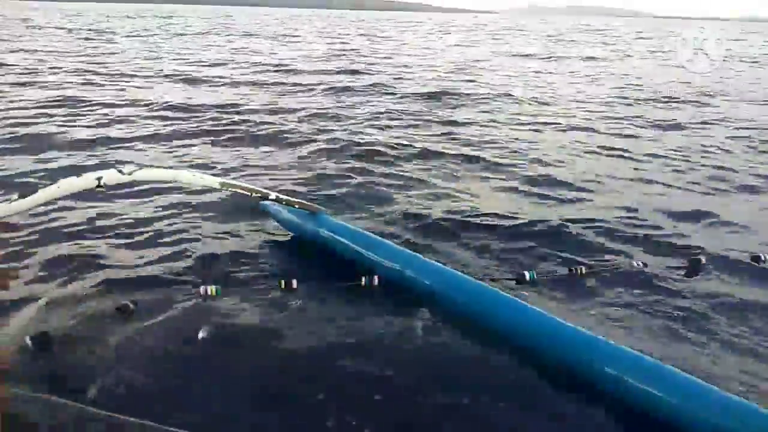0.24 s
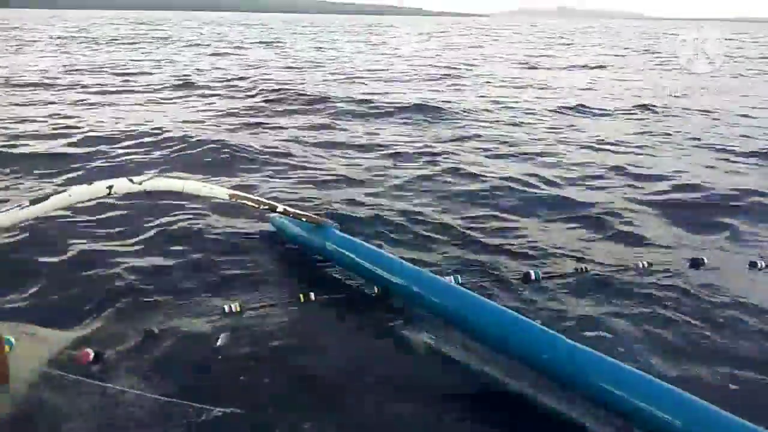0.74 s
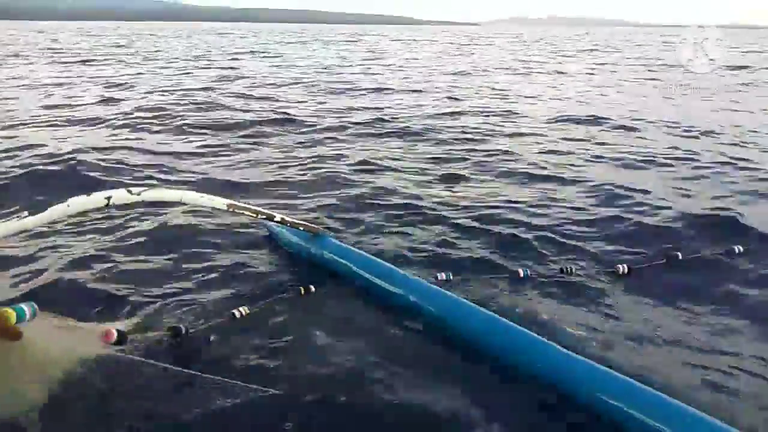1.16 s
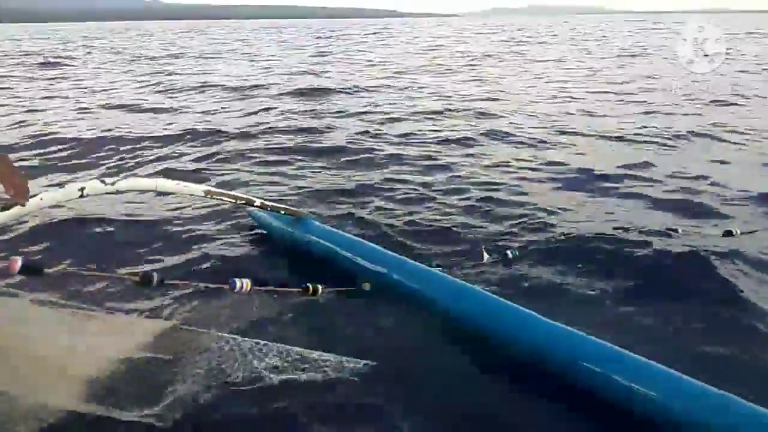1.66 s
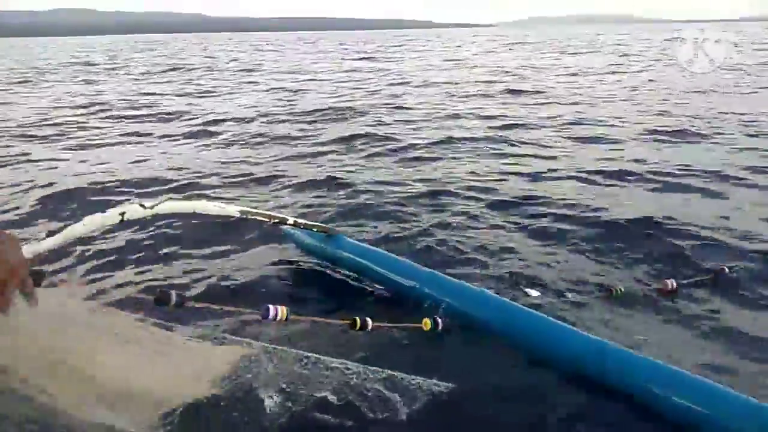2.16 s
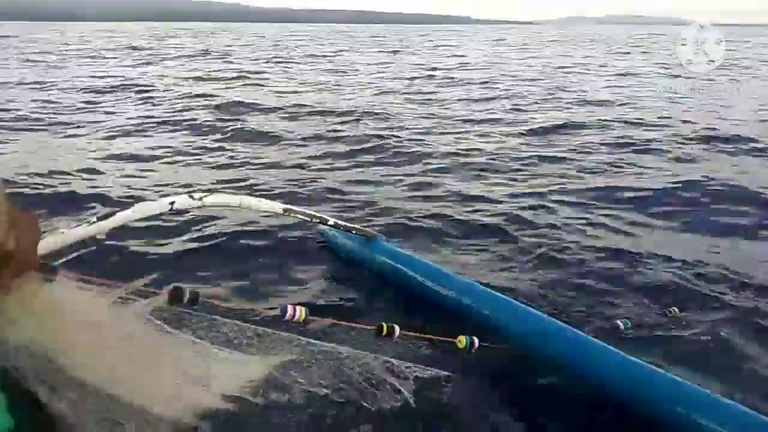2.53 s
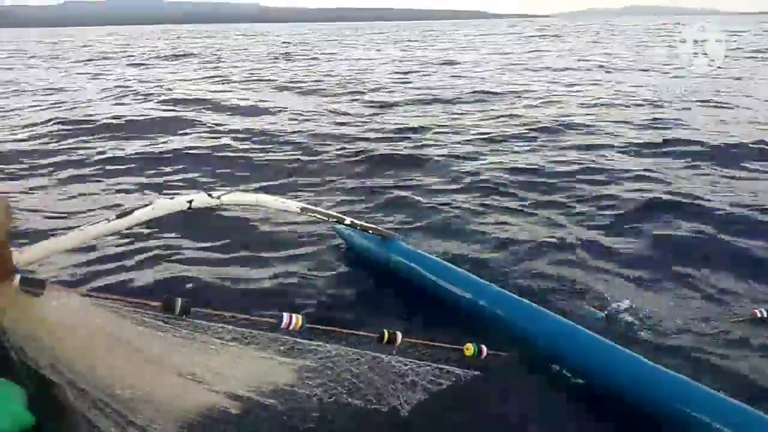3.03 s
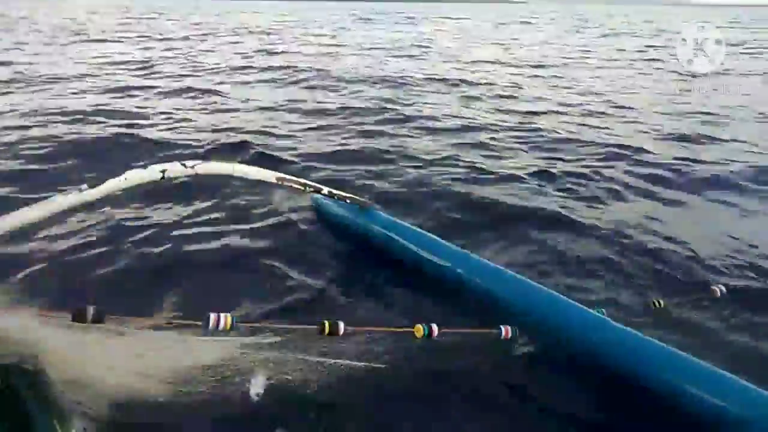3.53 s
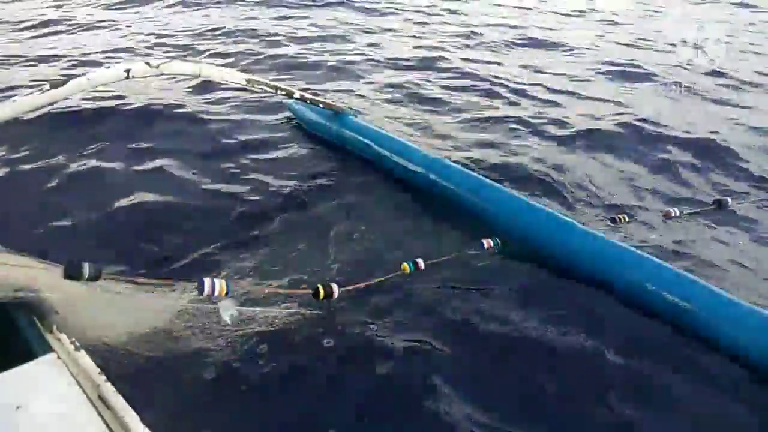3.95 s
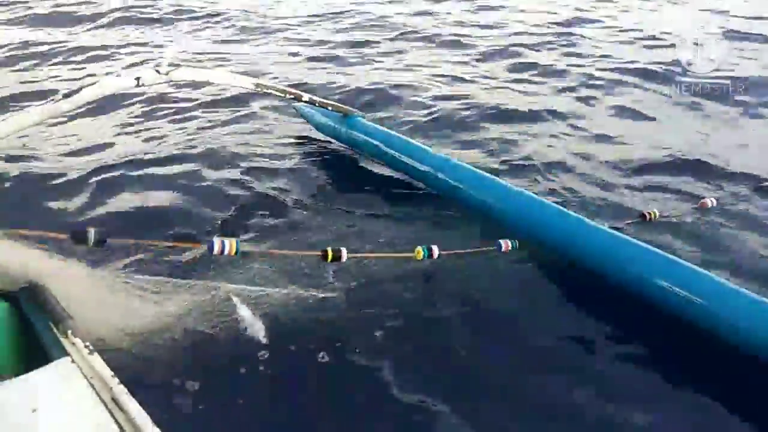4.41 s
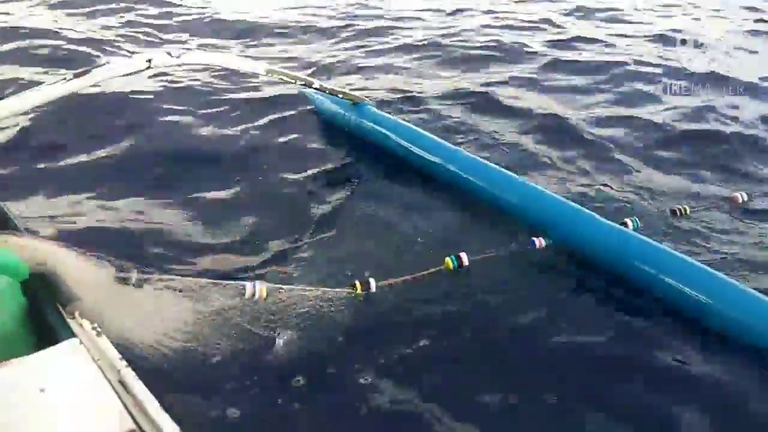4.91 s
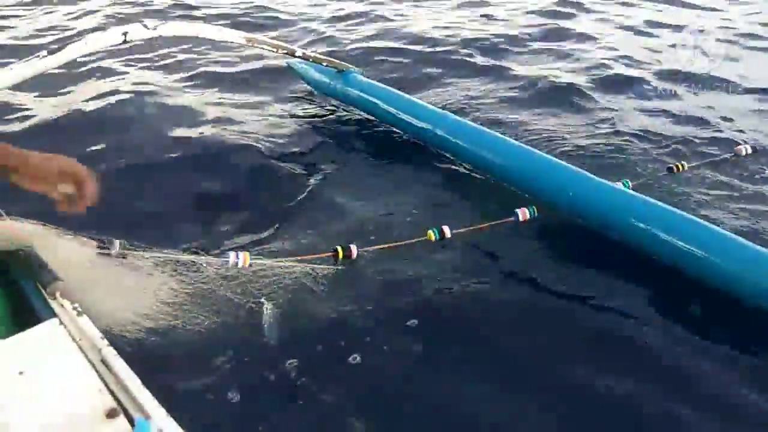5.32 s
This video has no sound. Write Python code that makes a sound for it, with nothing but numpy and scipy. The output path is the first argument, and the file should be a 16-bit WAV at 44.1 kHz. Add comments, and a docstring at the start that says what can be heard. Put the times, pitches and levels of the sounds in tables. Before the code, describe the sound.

Close stereo outdoor sound of a wet fishing net drawn over a boat's side. Bright drips and small bubbles patter over low hollow gurgles and occasional dull hull thuds. The first second is knocky, the middle lighter and trickling, then water churns and the mesh rushes more loudly from about 3.6 to 4.8 seconds. After a lull, dripping picks up at the end. Faint sea hush and low wind puffs lie beneath.

```python
"""In a small outrigger boat on a light sea, a fishing net is hauled in by hand.
The wet mesh swishes and ticks over the side as shaped noise, grains and ringing bubbles.
Wavelets slap, gurgle and drip beside the hull: noise bursts through resonances, and decaying sines that climb.
Dull knocks excite the modes of the hull.
A breeze puffs on the left microphone port as low noise and brief eddies."""
import sys
import numpy as np
from scipy import signal
from scipy.fft import rfft, irfft, next_fast_len
from scipy.io import wavfile
from scipy.ndimage import uniform_filter1d

SR = 44100
rng = np.random.default_rng(int(sys.argv[2]) if len(sys.argv) > 2 else 0)


def digitize_waveform(pressure):
    """Quantize a signal to 16-bit integers and store it at the path in sys.argv[1].

    Rows of a 2-D input are taken as channels; values are limited to [-1, 1].
    """
    field = np.atleast_2d(pressure).T
    bounded = np.clip(field, -1, 1)
    quanta = np.round(bounded * 32767).astype(np.int16)
    wavfile.write(sys.argv[1], SR, quanta)


N = 245637
TIME = np.arange(N) / SR

# Slaps and splashes of wavelets on the hull. Each row: start in seconds, air pocket level in dB,
# its pitch in Hz, its left-right difference in dB, hollow body level in dB, bite of the snap in dB,
# spray level in dB, decay by 60 dB in seconds, time to swell by 20 dB in seconds.
SLAPS = [(0.38, -61.5, 1880, -9, -78, -62, -59.5, 0.07, 0.0093),
         (0.5905, -36, 2280, 4, -34, -47, -45.5, 0.04, 0.0092),
         (0.7545, -41.5, 3100, 1, -49, -79, -57, 0.029, 0.0023),
         (0.776, -61, 2780, 2, -62, -70, -60, 0.028, .003),
         (0.79, -54, 2420, -1, -57, -73, -64, 0.024, 0.0025),
         (0.821, -51.5, 3230, 3, -71, -51, -48.5, 0.16, 0.0082),
         (0.849, -40.5, 2480, 6, -54, -41, -40.5, 0.06, 0.012),
         (0.866, -49, 3430, -7, -50, -51.5, -46, 0.02, 0.011),
         (0.924, -55, 3200, 0, -66, -58, -51.5, 0.018, 0.0052),
         (2.059, -41.5, 2880, 1.5, -48, -78, -52, 0.027, 0.007),
         (2.145, -56.5, 4040, 0, -85, -59, -60, 0.054, .008),
         (2.3225, -49.5, 2650, 0, -60, -55.5, -56, 0.033, 0.004),
         (2.502, -52, 3220, 0, -74, -67, -59, 0.091, 0.0095),
         (2.573, -60.5, 3640, -3, -82, -82, -74, 0.016, .008),
         (2.606, -43.5, 3020, 9.5, -64, -58, -53, 0.015, 0.0033),
         (2.612, -36.5, 2610, 3.5, -60, -64, -48, 0.018, 0.011),
         (2.6687, -44, 4000, 0, -54.5, -63, -52, 0.022, 0.014),
         (2.6994, -36, 2260, 1.5, -60, -45, -43.5, 0.021, 0.0058),
         (2.833, -55, 4460, 0, -84, -60, -56.5, 0.059, .008),
         (2.88, -52.5, 3100, -5, -90, -71, -72, 0.019, 0.0046),
         (2.908, -50, 4800, 1, -83, -59, -50.5, 0.052, 0.012),
         (3.054, -54.5, 3906, -3, -62, -82, -66, 0.015, 0.0051),
         (3.975, -51, 1950, 6, -47.5, -71, -64, 0.008, 0.003),
         (4.015, -51, 3640, 0, -70, -60, -49, 0.077, 0.0089),
         (4.05, -61, 2180, 4, -50.5, -66, -58, .03, 0.0018),
         (4.455, -44.5, 2900, 2, -47, -45.5, -45, 0.11, 0.019),
         (4.526, -44.5, 3900, -1, -80, -59, -53, 0.019, 0.0024),
         (4.58, -46, 4430, 1, -62, -65, -54, 0.048, 0.0078),
         (4.649, -43, 4080, 1.5, -51.5, -69, -51, 0.009, 0.011),
         (4.774, -49.5, 2060, 3, -54, -56, -54, 0.051, .004),
         (4.86, -51, 1710, 7, -67, -81, -73, 0.034, .006),
         (4.912, -53, 1800, 8.5, -72, -62, -62, 0.031, 0.0038),
         (5.375, -60, 2020, -9, -86, -55.5, -51.5, 0.019, 0.015),
         (5.453, -48.5, 2000, 6, -74, -72, -56, 0.18, 0.01),
         (5.518, -39.5, 4120, -1, -46.5, -65, -53, 0.035, 0.0087),
         (5.536, -39, 3280, 2.5, -44, -65, -51, 0.044, .008)]
# the waterline shifts the resonances from blow to blow: octaves
HOLLOW_SPREAD_OCT, HULL_SPREAD_OCT = .13, .07


def from_db(db):
    """Decibels to amplitude ratio: twenty decibels are a factor of ten."""
    return 10 ** (np.asarray(db) / 20)


def rms_one(x):
    """Normalise the mean power to 1."""
    return x / np.sqrt(np.mean(x ** 2) + 1e-20)


def at_hz(points, hz):
    """Interpolate a curve on a logarithmic frequency axis."""
    f, value = np.transpose(points)
    return np.interp(np.log(hz + 1e-6), np.log(f), value)


def pan(db):
    """Interchannel level difference as left and right gains; positive is left."""
    return from_db(np.array([[db], [-db]]) / 2)


def add(out, s, sound):
    """Superpose a short sound on the scene from time s."""
    i = min(max(round(s * SR), 0), N - 1)
    out[:, i:i + sound.shape[-1]] += sound[..., :N - i]


def drift(rate):
    """Slow random modulation of rms 1: Gaussian knots, rate per second, joined by lines."""
    knots = rng.standard_normal(2000)
    return rms_one(np.interp(TIME * rate, np.arange(len(knots)), knots))


def band(x, low_hz, high_hz, order=2):
    """Butterworth band-pass: a maximally flat passband."""
    sos = signal.butter(order, [low_hz, min(high_hz, .45 * SR)], "band", fs=SR, output="sos")
    return signal.sosfilt(sos, x)


def resonate(x, hz, width_hz):
    """Damped two-pole resonance with gain 1 at its peak."""
    r = np.exp(-np.pi * width_hz / SR)
    zeros = np.array([1, 0, -1]) * (1 - r * r) / 2
    poles = [1, -2 * r * np.cos(2 * np.pi * hz / SR), r * r]
    return signal.lfilter(zeros, poles, x + 1e-18)


def grains(per_s, spread_db):
    """Random impulses of uneven size and either sign: shot noise of rms 1."""
    sizes = from_db(spread_db * np.minimum(rng.exponential(1, N), 4))
    return rms_one((rng.random(N) < per_s / SR) * sizes * rng.choice([-1, 1], N))


def colour(pair, spectrum, lag_s=0):
    """Spectral shaping and interchannel coherence: the two ports differ more in the treble; the left lags."""
    # Likeness of the two ports. Each row: frequency in Hz, coherence from 0 to 1.
    likeness = [(100, 0.77), (450, 0.8), (900, 1), (1800, 1), (6000, 0.29), (15000, 0.098)]
    size = next_fast_len(N)
    hz = np.arange(size // 2 + 1) * SR / size
    mid, side = rfft(pair, size) * from_db(at_hz(spectrum, hz))
    alike = np.clip(at_hz(likeness, hz), 0, 1)
    mid, side = np.sqrt(1 + alike) * mid, np.sqrt(1 - alike) * side
    left = (mid + side) * np.exp(-2j * np.pi * hz * lag_s)
    return rms_one(irfft(np.array([left, mid - side]), size)[:, :N])


def bubble(hz, cycles, rise):
    """Bubble resonance: a note sinks 60 dB in its cycles and climbs by the fraction rise nearing the surface."""
    age = np.arange(int(cycles / hz * SR) + 2) / SR * hz / cycles
    note = np.sin(2 * np.pi * cycles * (age + rise * age ** 2 / 2))
    return note * from_db(-60 * age) * (1 - np.exp(-age * cycles / 2))


def fizz(per_s, low_hz, high_hz, cycles, spread_db, clump_db, count=40):
    """Impulses excite a bank of damped resonators: tiny bubbles burst in clumps at many pitches; rms 1."""
    out = np.zeros((2, N))
    clumps = from_db(clump_db * drift(30))
    for hz in np.geomspace(low_hz, high_hz, count):
        at = rng.integers(0, N, 400)
        chance, size, place = rng.random((3, len(at)))
        size = from_db(spread_db * np.minimum(-np.log(1 - size), 3.5))
        size = size * (chance < per_s * clumps[at] * N / SR / count / len(at))
        # place sets both a level and a time difference between the ports
        right_at = np.minimum(at + (40 * (place - .5)).astype(int), N - 1)
        clicks = np.zeros((2, N))
        clicks[0, at] = size * (.5 + place)
        clicks[1, right_at] = size * (1.5 - place)
        out += rms_one(resonate(clicks, hz, np.log(1000) / np.pi * hz / cycles))
    return rms_one(out)


def swells(rows, base_db=-120):
    """Powers add: each swell climbs 20 dB in its rise and sinks 20 dB in its fall, over a base; in dB."""
    power = from_db(base_db) ** 2
    for s, db, rise_s, fall_s in rows:
        away = np.maximum((s - TIME) / rise_s, (TIME - s) / fall_s)
        power = power + from_db(db - 20 * np.minimum(away, 10)) ** 2
    return 10 * np.log10(power)


def open_sea():
    """Stationary filtered noise: the hush of the open sea."""
    # Spectrum of the hush. Each row: frequency in Hz, level in dB per Hz.
    hush = [(30, -18), (110, 21.5), (250, -14), (600, 2.5), (1200, -46), (2500, -48), (6500, -32),
            (9000, -7), (15500, -7.5)]
    return from_db(-70.0) * colour(rng.standard_normal((2, N)), hush)


def wind():
    """Turbulent pressure at the ports: lumpy low noise and single eddies, stronger on the left."""
    # Gusts. Each row: time of the crest in seconds, rumble level in dB before panning, rise and fall in seconds.
    gusts = [(0.02, -58, 0.3, 0.097), (0.5, -63, 0.053, 0.09), (0.88, -60.5, 0.14, 0.27),
             (1.3, -52.5, 0.34, 0.39), (2.55, -60, 0.1, 0.24), (2.99, -56, 0.067, 1),
             (3.3, -54.5, 0.21, 0.52), (3.98, -60, 0.37, 0.2), (4.62, -57, 0.61, 0.36)]
    # Spectrum of the rumble. Each row: frequency in Hz, level in dB per Hz.
    rumble = [(20, -15), (40, -23), (65, 2), (110, -1.5), (150, -4.5), (220, -17.5), (400, -34), (900, -82)]
    # Strongest eddies. Each row: start in seconds, peak level in dB before panning, pitch in Hz.
    puffs = [(0.112, -57, 130), (0.198, -62, 120), (0.589, -56, 121), (1.05, -50, 124), (1.155, -39.5, 132),
             (1.184, -40, 111), (1.221, -42, 126), (1.256, -38.5, 150), (1.369, -40, 92.3),
             (1.424, -40.5, 106), (1.751, -55, 108), (1.829, -56.5, 117.7), (1.964, -46.5, 107),
             (2.006, -53.5, 123), (2.484, -46, 86.5), (2.537, -46.5, 106), (2.667, -51, 110),
             (2.945, -47.5, 131), (3.014, -47.5, 109.8), (3.052, -46, 110), (3.121, -36, 95),
             (3.167, -37, 136), (3.203, -34, 118.2), (3.232, -40.5, 110), (3.286, -32.5, 117),
             (3.349, -39, 81), (3.395, -62, 120), (3.466, -45.5, 99.5), (3.58, -54, 108),
             (3.729, -54, 108.6), (3.895, -50, 90), (3.944, -48, 89.5), (3.99, -47.5, 150),
             (4.325, -39.5, 125), (4.407, -39.5, 120), (4.525, -46, 119), (4.774, -42.5, 134.6),
             (4.802, -54, 130), (4.845, -47, 113), (4.96, -54, 118.2), (4.99, -60, 120.1),
             (5.19, -51.5, 101.7), (5.454, -58, 109)]
    calm_db, flutter_db = -81.5, 2.5
    rumble_db = swells(gusts, calm_db) + flutter_db * drift(25)
    left = colour(rng.standard_normal((2, N)), rumble)[0]
    right = colour(rng.standard_normal((2, N)), rumble)[0]
    out = np.array([left, 3.1 * left + 3.9 * right]) * from_db(rumble_db) * pan(19.8)
    t = TIME[:SR // 12]
    for s, peak_db, hz in puffs:
        age = t / 0.0041
        # an eddy swells and passes in a few cycles
        eddy = age ** 2 * np.exp(2 - age) / 4 * np.sin(2 * np.pi * (hz * t + rng.random()))
        add(out, s, from_db(peak_db) * pan(18.5) * eddy)
    return out


def wash():
    """Cavity resonance: water churns and bubbles along the hull and sounds a hollow of gliding pitch."""
    # Waves. Each row: time of the crest in seconds, wash level in dB, deep gurgle level in dB,
    # rise and fall in seconds, pitch of the hollow in Hz.
    waves = [(0.063, -65, -54.5, 0.24, 0.11, 935), (0.521, -57, -60, 0.22, 0.13, 711),
             (0.86, -50, -55.5, 0.14, 0.087, 732), (0.981, -66, -56.5, 0.17, 0.32, 782),
             (1.501, -56, -51.5, 0.25, 0.2, 860), (1.727, -46, -53.5, 0.15, 0.053, 808),
             (1.882, -62.5, -64.5, 0.38, 1, 805), (2.3, -74, -61, 0.39, 0.062, 810),
             (3.242, -47, -51, 0.31, 0.23, 769), (3.492, -49.5, -55, 0.16, 0.061, 948),
             (3.76, -47, -54.5, 0.22, 0.18, 851), (4.08, -54, -49, 0.27, 0.25, 1001),
             (4.298, -49.5, -53, 0.1, 0.12, 911), (4.428, -40.5, -52, 0.18, 0.083, 860),
             (4.729, -71, -46, 0.21, 0.07, 754), (5.092, -52, -64, 0.3, 0.12, 906),
             (5.55, -59, -71, 0.093, 0.089, 766)]
    # Spectrum of the deep gurgle. Each row: frequency in Hz, level in dB per Hz.
    deep = [(90, 18), (200, 22), (330, 8), (420, -19), (500, -32), (700, 12.5), (1400, -34)]
    calm_wash_db, calm_gurgle_db = -75, -71.5  # between waves
    s, crest_db, deep_db, rise_s, fall_s, pitch_hz = np.transpose(waves)
    hollow_hz = np.interp(TIME, s, pitch_hz)
    wash_db = swells(zip(s, crest_db, rise_s, fall_s), calm_wash_db)
    gurgle_db = swells(zip(s, deep_db, rise_s, fall_s), calm_gurgle_db)
    churn = colour(rng.standard_normal((2, N)), [(20, 0), (16000, 0)])
    # a narrow band of churning, carried on the moving pitch
    analytic = signal.hilbert(churn, next_fast_len(N))[:, :N]
    slow = signal.sosfilt(signal.butter(2, 55, fs=SR, output="sos"), analytic)
    hollow = rms_one(np.real(slow * np.exp(2j * np.pi * np.cumsum(hollow_hz) / SR)))
    bubbling = fizz(per_s=350, low_hz=620, high_hz=1250, cycles=24, spread_db=1.5, clump_db=4, count=14)
    surge = from_db(-10.5) * hollow + from_db(-16.5) * rms_one(band(churn, 764, 910))
    surge = surge + from_db(-11.0) * bubbling
    burbles = fizz(per_s=130, low_hz=200.3, high_hz=434, cycles=38.0, spread_db=11.5, clump_db=2.0, count=8)
    gurgle = from_db(-5.5) * colour(rng.standard_normal((2, N)), deep) + from_db(-7.0) * burbles
    return surge * from_db(wash_db + 3.0 * drift(41)) + gurgle * from_db(gurgle_db + 3.4 * drift(40))


def sloshes():
    """Entrained air resonates: water folds over beside the hull in a run of deep, overlapping bubbles."""
    # Folds. Each row: time of the crest in seconds, level in dB, rise and fall in seconds.
    fold_rows = [(0.98, -61.5, 0.067, 0.08), (1.53, -62, 0.03, 0.092), (1.72, -59, 0.062, 0.026),
                 (2.285, -60, 0.057, 0.025), (3.19, -70, 0.039, 0.051), (3.33, -55, 0.081, 0.066),
                 (3.74, -58.5, 0.056, 0.13), (4.1, -53, 0.11, 0.049), (4.46, -63, 0.08, 0.057),
                 (4.66, -52.5, 0.2, 0.15)]
    folds = fizz(per_s=500, low_hz=225, high_hz=553, cycles=25.0, spread_db=6.5, clump_db=1, count=10)
    return folds * from_db(swells(fold_rows))


def glugs():
    """Volume resonance of large air pockets escaping along the hull, each a soft, round note."""
    # Air pockets. Each row: start in seconds, peak level in dB, pitch in Hz, ringing in cycles.
    pockets = [(0.503, -66, 660, 45), (0.535, -65, 620, 37), (0.925, -58, 726, 48), (0.945, -55, 684, 36),
               (0.97, -51, 750, 28), (1.005, -54, 800, 31), (1.03, -54, 750, 25), (1.598, -49.5, 734, 30),
               (1.674, -58, 894, 60), (1.719, -43, 705, 30), (1.769, -41.5, 818, 91), (1.885, -48, 785, 41),
               (2.274, -57, 840, 63), (2.32, -55.5, 772, 60), (3.012, -53.5, 755, 58),
               (3.088, -55, 727, 79), (3.167, -49.5, 736, 89), (3.178, -57.5, 353, 32),
               (3.205, -44.5, 798, 59), (3.238, -37.5, 743, 76), (3.271, -45, 735, 110),
               (3.316, -43.5, 752, 49), (3.328, -50.5, 350, 13), (3.356, -51, 707, 50),
               (3.694, -47, 730, 66), (3.733, -48, 915, 39), (3.766, -45, 684, 32), (4.007, -52, 977, 57),
               (4.104, -46.5, 927, 40), (4.358, -45, 960, 210), (4.477, -44.5, 722, 39),
               (4.585, -45.5, 793, 28), (4.7, -46, 310, 16), (4.732, -41, 260, 8.2), (4.755, -45, 192, 5.8),
               (4.96, -53, 993, 68), (5.008, -52, 898, 49), (5.085, -46, 952, 45)]
    swell_s = 0.0037
    out = np.zeros((2, N))
    for s, peak_db, hz, cycles in pockets:
        note = bubble(hz, cycles, rise=0.083)
        note = note * (1 - np.exp(-(TIME[:len(note)] / swell_s) ** 2))
        add(out, s, from_db(peak_db) * note / np.abs(note).max())
    return out


def knocks():
    """Modal excitation: water bumps the hull with a short blow and ragged churning, and its modes ring."""
    # Dull knocks. Each row: start in seconds, peak level in dB, pitch that the blow favours in Hz,
    # time in which the churning of the contact sinks 40 dB in seconds.
    blows = [(0.2955, -37, 710, 0.067), (0.299, -34.5, 346, 0.098), (0.316, -38, 246, 0.12),
             (0.465, -41, 690, 0.042), (0.465, -29, 228, 0.065), (0.49, -45, 202, 0.24),
             (0.52, -46, 226, 0.066), (0.5895, -29.5, 633, 0.066), (0.754, -44, 950, 0.048),
             (0.819, -41.5, 320, 0.1), (0.92, -45.5, 192, 0.074), (0.968, -42, 258.5, 0.14),
             (1.004, -44, 226, 0.05), (1.032, -48, 217, 0.067), (1.708, -44, 363, 0.047),
             (2.069, -45.5, 298, 0.2), (2.266, -51, 417, 0.12), (2.752, -46.5, 243.9, 0.05),
             (3.316, -48, 420, 0.065), (3.856, -42, 270, 0.088), (3.974, -42.5, 345, 0.026),
             (3.975, -52, 890, 0.015), (4.048, -42, 825, 0.062), (4.092, -37.5, 500, 0.099),
             (4.423, -25.5, 358, 0.085), (4.436, -32.5, 320, 0.077), (4.478, -34.5, 324, 0.04),
             (4.588, -40, 298, 0.058), (4.688, -39.5, 623, 0.1), (4.693, -36, 283, 0.1),
             (4.717, -35, 228.3, 0.065), (5.538, -33, 636, 0.08)]
    # Hull modes before the shift of each blow. Each row: frequency in Hz, level in dB, decay by 60 dB in seconds.
    modes = [(132, 10, 0.14), (164, 12, 0.048), (210, 3, 0.069), (262, -1, 0.092), (313, 9.5, 0.18),
             (440, -2, 0.058), (527, -2.5, 0.07), (680, 9.5, 0.017), (794, 12, 0.019), (910, 16, 0.12),
             (1210, -13, 0.15)]
    rough_db, ring_db, mode_spread_db = -4.5, 1.5, 2.5  # churning against blow, ring against push, chance
    out, t = np.zeros((2, N)), TIME[:SR // 4]
    for s, peak_db, hz, contact_s in blows:
        age = t * hz / 0.5
        blow = age ** 2 * np.exp(2 - age) / 4 * np.sin(2 * np.pi * hz * t)
        churn = rng.standard_normal(2 * len(t)) + .25 * rng.standard_normal((2, 2 * len(t)))
        # the first half lets the filter settle
        churn = rms_one(band(churn, 0.62 * hz, 1.32 * hz, order=3)[:, len(t):])
        contact = (1 - np.exp(-age)) * from_db(-40 * t / max(contact_s, .003))
        push = blow + from_db(rough_db) * churn * contact
        ring = 0
        for f, db, t60 in modes:
            gain = from_db(db + mode_spread_db * rng.standard_normal())
            mode_hz = f * 2 ** (HULL_SPREAD_OCT * rng.uniform(-1.14, 1))
            ring = ring + gain * resonate(push, mode_hz, np.log(1000) / np.pi / t60)
        thud = rms_one(push) + from_db(ring_db) * rms_one(ring)
        add(out, s, from_db(peak_db) * thud / np.abs(thud).max())
    return out


def ripples(mesh_db):
    """Weak random impacts: ripples lick the hull, with levels following the mesh; columns as in SLAPS."""
    per_s, spread_db, t60_s, closing_s = 7, 2, 0.025, .008
    pocket_db, body_db, bite_db, spray_db = -4, -13, -18, -8  # against the mesh level
    rows = []
    for when, size, pitch, place in rng.random((int(per_s * N / SR), 4)):
        db = mesh_db[int(when * N)] + spread_db * (2 * size - 1)
        hz = 1680 * 2 ** (1.38 * pitch)
        rows.append((when * N / SR, db + pocket_db, hz, 10 * (place - .5),
                     db + body_db, db + bite_db, db + spray_db, t60_s, closing_s))
    return rows


def slaps(rows):
    """Impact excites cavities: a wavelet closes with cracks and a snap, then air pocket, body and spray sound."""
    tail_db, tail_t60_s = -16, .085  # the wet tail of every slap
    ragged_db = 4  # the cracks come in bunches a few ms long
    low_spray_db = -4.5  # spray below 12.5 kHz, against its top
    out, t = np.zeros((2, N)), TIME[:SR // 6] - .02
    after = np.maximum(t, 0)
    for s, pocket_db, hz, side_db, body_db, bite_db, spray_db, t60, closing_s in rows:
        closing = from_db(20 * np.minimum(t, 0) / max(closing_s, .001))
        dying = from_db(-60 * after / max(t60, .01)) + from_db(tail_db - 60 * after / tail_t60_s)
        uneven = from_db(3.5 * rng.standard_normal(len(t)))
        cracks = rng.standard_normal((2, len(t))) * uneven * closing * dying
        bunches = rms_one(uniform_filter1d(rng.standard_normal(len(t)), size=100))
        cracks = cracks * from_db(ragged_db * bunches)
        cracks[:, np.searchsorted(t, 0)] += 4.5  # the snap
        cracks = band(cracks, 520, 18000, order=3)
        pocket = resonate(cracks, hz, 0.2 * hz) + .4 * resonate(cracks, 1.55 * hz, 0.14 * hz)
        pocket = pocket + 0.25 * band(cracks, 1000, 4500)
        alike = (cracks + 0.21 * cracks[::-1]) * closing
        shift = 2 ** (HOLLOW_SPREAD_OCT * rng.uniform(-0.37, 1, 2))
        body = resonate(alike, 740 * shift[0], 130) - 0.49 * resonate(alike, 1120 * shift[1], 300)
        bite = band(cracks, 4300, 6900, order=3)
        spray = band(cracks, 13000, 16000) + from_db(low_spray_db) * band(cracks, 6500, 12500)
        # each part is levelled as if its energy lay within 25 ms
        pocket, body, bite, spray = (x / np.sqrt(np.sum(x ** 2) / (SR / 20))
                                     for x in (pocket, body, bite, spray))
        splash = from_db(pocket_db) * pocket * pan(side_db) + from_db(body_db) * body
        splash = splash + from_db(bite_db) * bite + from_db(spray_db) * spray * pan(4.9)
        add(out, s + t[0], splash)
    return out


def spatter():
    """Bubble resonance in miniature: each slap bursts into a tight scatter of droplets, the later ones fainter."""
    over_slap_db, within_s = 9, .014  # ceiling against the air pocket; time in which all burst
    out = np.zeros((2, N))
    for s, pocket_db, hz, side_db, *_ in SLAPS:
        for delay, pitch, size, place in rng.random((10, 4)):
            db = pocket_db + over_slap_db - 9 * size - 12 * delay
            gain = from_db(db) * pan(side_db + 12 * (place - .5))
            note = bubble(hz * 2 ** (1.6 * pitch - .9), cycles=16, rise=0.2)
            add(out, s + within_s * delay, gain * note)
    return out


def drops(trickle_db):
    """Trapped-air resonance: falling drops give a soft splat, a bubble note, then smaller bubbles near its pitch."""
    # Clearest drops. Each row: start in seconds, relative level in dB, pitch in Hz, left-right difference in dB.
    clear = [(0.025, -36, 2230, -1), (0.077, -36.5, 2044, 1), (0.193, -46, 1123, 5), (0.36, -51, 1130, -14),
             (0.381, -40.5, 1885, 13), (0.465, -41.5, 2270, 3), (0.522, -40.5, 1770, 5),
             (0.522, -46, 1340, 0), (0.689, -41, 1480, 0), (0.821, -33, 3340, -2), (0.834, -33, 2880, 0),
             (0.998, -40, 5330, -1), (1.049, -45.5, 1460, 7), (1.141, -45, 3720, -1), (1.15, -41, 2680, 1),
             (1.163, -43.5, 2510, 1), (1.24, -41.5, 2730, 1), (1.28, -45, 2390, 2), (1.302, -44, 2990, 2),
             (1.304, -39, 1900, -8), (1.321, -44.5, 1220, 9), (1.365, -41.5, 1190, 6),
             (1.453, -48.5, 1690, 3), (1.462, -52, 3840, -1), (1.515, -41, 4300, 0), (1.545, -49, 2520, 5),
             (1.602, -40, 3460, 3), (1.647, -29, 2545, -1), (1.68, -41, 1233, 3), (1.779, -48, 1290, -2),
             (1.751, -37, 3220, 13), (1.796, -33.5, 2720, 10), (1.885, -36, 1960, -2), (1.9, -44, 1180, 9),
             (1.965, -40, 2870, 16), (1.996, -36, 2400, 4), (2.015, -36, 3034, 14), (2.139, -35.5, 1654, 2),
             (2.321, -40, 2620, 11), (2.369, -46, 1660, 13), (2.433, -35.5, 1700, -5),
             (2.511, -31.5, 2950, 14), (2.738, -38, 2600, 2), (2.742, -38, 2040, -5),
             (2.992, -38.5, 3140, 10), (3.02, -32.5, 1675, 1), (3.435, -38, 3280, 3), (3.71, -42, 1666, 1),
             (3.726, -41, 1975, 17), (3.743, -53, 1606, 0), (3.79, -45, 1550, 19), (3.872, -44, 1410, 1),
             (3.921, -48, 1600, 15), (4.087, -34, 2160, 7), (4.127, -38, 1916, 8), (4.184, -41, 2260, 21),
             (4.29, -40, 1310, 9), (4.378, -38, 2140, 18), (4.393, -31, 1430, -5), (4.401, -31, 3380, 10),
             (4.468, -41, 1450, 18), (4.546, -36, 2210, 3), (4.548, -45, 1520, 17), (4.649, -33, 1940, 17),
             (4.689, -39.5, 1670, 15), (4.709, -38, 3070, 14), (4.772, -25.5, 1299, 2),
             (4.807, -32, 2580, 0), (4.821, -44, 2030, -8), (4.857, -43.5, 1646, 13),
             (5.249, -36.5, 1925, 20), (5.264, -36, 2290, -2), (5.353, -33, 4260, 5),
             (5.362, -31, 2170, 12), (5.373, -43, 1680, 21), (5.394, -29, 2360, 8), (5.423, -39, 1930, 18),
             (5.441, -33.5, 2520, 13), (5.503, -34, 2360, 17)]
    per_s, over_trickle_db, spread_db = 45, 2, 3  # small random drops follow the run-off
    closing_s = .003  # time constant with which the cavity closes
    twins, twin_db, twin_s = 2, -11, .013  # smaller bubbles pinch off just after the first
    out, t = np.zeros((2, N)), TIME[:SR // 20]
    small = []
    for i in rng.integers(0, N, int(per_s * N / SR)):
        db = trickle_db[i] + over_trickle_db + spread_db * rng.standard_normal()
        small.append((TIME[i], db, 1113 * 2 ** (2.387 * rng.random()), rng.normal(0.97, 10.0)))
    closing = 1 - np.exp(-t / closing_s)
    for s, db, hz, side_db in clear + small:
        noise = rng.standard_normal((2, len(t)))
        splat = rms_one(resonate(resonate(noise, hz, 1.1 * hz), hz, 1.1 * hz)) * from_db(-60 * t / 0.031)
        gain = from_db(db) * pan(side_db)
        add(out, s - .003, 0.17 * gain * splat * closing)
        note = bubble(hz, cycles=35.0, rise=0.026)[:len(t)]
        note = note * closing[:len(note)]
        add(out, s, 0.29 * gain * note / np.abs(note).max())
        for delay, pitch, place in rng.random((twins, 3)):
            twin = bubble(hz * 2 ** (.35 * pitch - .05), cycles=35, rise=.15)
            twin_gain = gain * from_db(twin_db - 8 * delay) * pan(12 * (place - .5))
            add(out, s + twin_s * delay, twin_gain * twin)
    return out


def bubble_cloud(trickle_db):
    """Superposed bubble resonances: the run-off churns up clumps, each bubble with its own rising note and place."""
    per_s, spread_db, cloud_db = 750, 3, -4.5  # the last against the level of the run-off
    out = np.zeros((2, N))
    clumps = from_db(6 * drift(30))
    # random starts, denser where the clumps are
    starts = np.searchsorted(np.cumsum(clumps) / clumps.sum(), rng.random(int(per_s * N / SR))) / SR
    for s, (pitch, size, place, rise) in zip(starts, rng.random((len(starts), 4))):
        note = bubble(800 * 2 ** (2.4 * pitch), cycles=28, rise=.2 * rise)
        gain = from_db(spread_db * min(-np.log(1 - size), 3)) * pan(22 * place - 8)
        add(out, s, gain * note)
    return rms_one(out) * from_db(trickle_db + cloud_db)


def boat_echoes(x):
    """Convolution with decaying noise: a short scatter of reflections from the hull and the water."""
    t = TIME[:SR // 12]
    scatter = band(rng.standard_normal((2, len(t))), 184, 13500) * from_db(-60 * t / 0.057) * (t > .0015)
    return signal.fftconvolve(x, scatter / np.sqrt(np.sum(scatter ** 2) / 2), axes=1)[:, :N]


def strand():
    """Narrow-band friction noise: a taut nylon strand zips over the side, a brief, very high squeak on the left."""
    # One row: centre in seconds, level in dB before panning, pitch in Hz, length to 1/e on each side in seconds.
    zip_row = (4.624, -34, 14800, .011)
    s, db, hz, length_s = zip_row
    squeak = rms_one(resonate(resonate(rng.standard_normal((2, N)), hz, 1700), hz, 1700))
    return from_db(db) * squeak * np.exp(-((TIME - s) / length_s) ** 2) * pan(14.5)


def mesh_level():
    """Friction grows with the haul: the level of the sliding mesh in dB, steady haul and tugs adding in power."""
    # Steady sliding over the side. Each row: time in seconds, level in dB.
    haul = [(0.0, -66.5), (0.22, -73.5), (0.62, -59), (1.0, -63), (1.25, -60), (2.0, -59), (2.15, -62),
            (2.52, -60), (2.8, -64), (3.16, -67), (3.52, -55), (3.9, -54), (4.22, -51.5), (4.36, -46.5),
            (4.51, -51), (4.62, -47.5), (4.68, -47), (4.82, -59.5), (5.3, -71), (5.38, -58.5), (5.57, -48)]
    # Tugs on the net. Each row: time of the crest in seconds, level in dB, rise and fall in seconds.
    tugs = [(0.08, -69, 0.031, 0.059), (0.3, -57, 0.027, 0.054), (0.68, -47.5, 0.021, 0.034),
            (3.37, -62.5, 0.016, 0.63), (3.735, -40.5, 0.17, 0.21), (4.03, -52.5, 0.088, 0.28),
            (4.39, -43.5, 0.12, 0.23), (4.95, -51.5, 0.084, 0.079), (5.14, -54, 0.23, 0.073),
            (5.53, -66, 0.086, 0.099)]
    s, db = np.transpose(haul)
    return swells(tugs, np.interp(TIME, s, db))


def trickle_level(mesh_db):
    """Drainage adds in power: the run-off level in dB follows the mesh and swells as water pours off it."""
    # Pours. Each row: time of the crest in seconds, level in dB, rise and fall in seconds.
    pours = [(0.06, -58, 0.52, 0.1), (1.88, -54, 0.72, 0.42), (1.96, -58.5, 0.15, 0.1),
             (2.51, -77, 0.015, 0.034), (2.28, -56, 0.053, 0.038), (2.77, -56.5, 0.071, 0.019),
             (3.24, -46.5, 0.088, 0.082), (3.735, -56, 0.085, 0.1), (4.09, -49.5, 0.14, 0.1),
             (4.3, -46.5, 0.08, 0.045), (4.4, -50, 0.13, 0.099), (5.385, -59, 0.025, 0.062),
             (5.53, -53.5, 0.16, 0.17)]
    return swells(pours, mesh_db - 11)


def patchy(x):
    """Independent modulation of third-octave bands: small splashes, each in its own range of pitch."""
    size = next_fast_len(N)
    thirds = 3 * np.log2(np.clip(np.arange(size // 2 + 1) * SR / size, 800, 6400) / 800)
    spectrum = rfft(x, size)
    out = 0
    for k in range(10):
        third = irfft(spectrum * np.maximum(1 - np.abs(thirds - k), 0), size)[:, :N]
        out = out + third * from_db(5 * drift(80))
    return out


def net(mesh_db, trickle_db):
    """Stick-slip and shot noise: wet strands tick and shed spray and drops, which merge into a rush when hauled fast."""
    # Spectra of the swish, the run-off and the spray. Each row: frequency in Hz, level in dB per Hz.
    mesh = [(1500, -14), (2700, 8.5), (3400, 8), (4500, -4), (6600, 2), (7800, -23), (11000, -15.5),
            (16000, -40)]
    runoff = [(700, -40), (1200, -4), (1550, -1), (2200, 10), (2700, -3), (3400, -15), (5000, -33)]
    fine_spray = [(5000, -7), (8300, -4.5), (10500, -10), (13500, 0), (15000, 0), (16000, 2)]
    lag_s = 0.000449  # left after right
    swish_db, runoff_db, snag_spread_db = -5, -8.5, 2  # against mesh level, against run-off level, chance
    spray_db = -59 + 0.99 * (mesh_db + 60)  # -59 dB at a mesh level of -60 dB
    rub = np.array([grains(per_s=2000, spread_db=1.0) for _ in range(2)]) + .5 * rng.standard_normal((2, N))
    beads = fizz(per_s=550, low_hz=3000, high_hz=6900, cycles=60, spread_db=5.5, clump_db=4.0)
    drips = fizz(per_s=340, low_hz=1256, high_hz=3390, cycles=80, spread_db=3.0, clump_db=5.0)
    # share of the power that merges into a rush, from a slow to a fast haul
    merged = np.clip(np.interp(mesh_db, [-65, -45], [0.15, .7]), 0, 1)
    splashes = patchy(rub)
    swish = np.sqrt(merged) * colour(splashes, mesh, lag_s) + np.sqrt(1 - merged) * beads
    trickle = np.sqrt(merged) * colour(splashes, runoff, lag_s) + np.sqrt(1 - merged) * drips
    snag_db = snag_spread_db * drift(55)  # the mesh catches and slips
    spray = colour(rub, fine_spray, lag_s) * from_db(spray_db + .5 * snag_db + 2.23 * drift(35)) * pan(4.0)
    swish = swish * from_db(mesh_db + swish_db + snag_db) * pan(0.72)
    trickle = trickle * from_db(trickle_db + runoff_db + snag_db) * pan(3.5)
    return swish + trickle + spray


def scene():
    """Superposition of all sources around the boat; only the slaps with their spatter, the drops, the bubble
    cloud and the net have echoes."""
    mesh_db = mesh_level()
    trickle_db = trickle_level(mesh_db)
    background = open_sea() + wind() + wash()
    hull = sloshes() + glugs() + knocks()
    near = slaps(SLAPS + ripples(mesh_db)) + spatter() + drops(trickle_db)
    near = near + bubble_cloud(trickle_db) + net(mesh_db, trickle_db)
    return background + hull + strand() + near + from_db(-8.0) * boat_echoes(near)


def record(dry):
    """Port resonance and band limits: a band near 8 kHz is swallowed; the deep bass and the top are cut."""
    ported = dry - 0.68 * resonate(dry, 8400, 2800)
    ported = signal.sosfilt(signal.butter(2, 42, "high", fs=SR, output="sos"), ported)
    return signal.sosfilt(signal.ellip(12, .2, 80, 15700, fs=SR, output="sos"), ported)


dry = scene()
out = record(dry)
digitize_waveform(out)
```